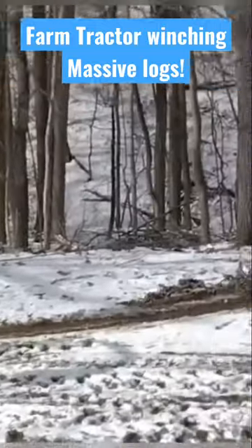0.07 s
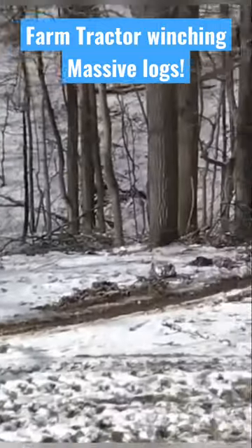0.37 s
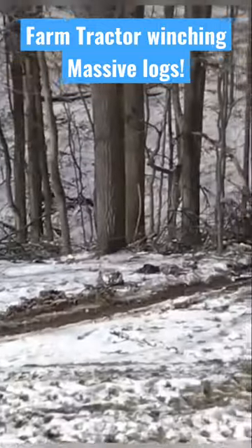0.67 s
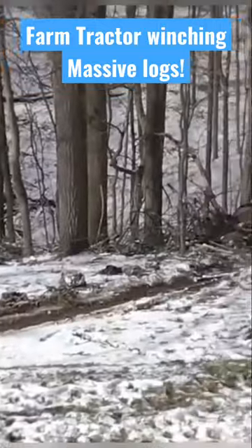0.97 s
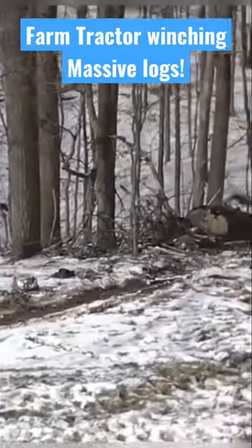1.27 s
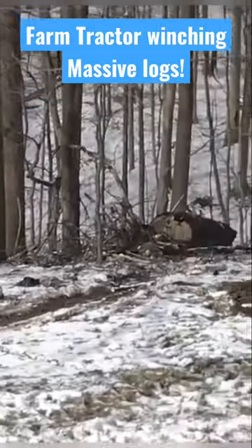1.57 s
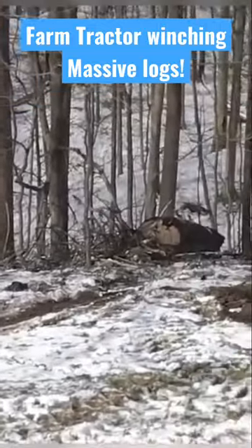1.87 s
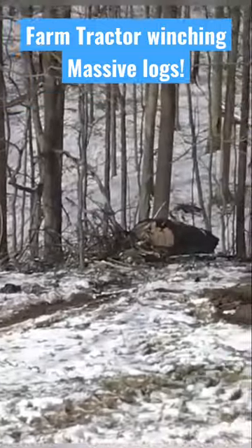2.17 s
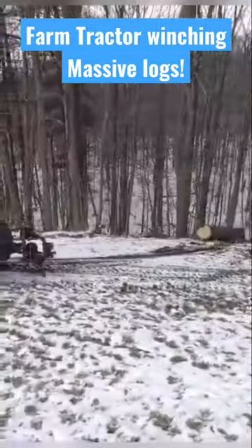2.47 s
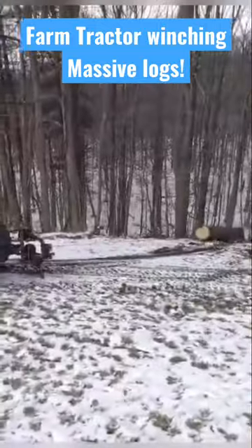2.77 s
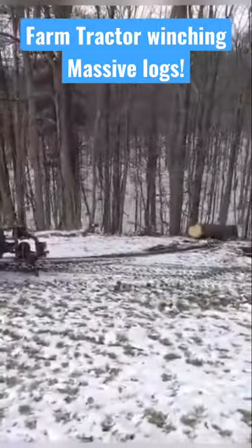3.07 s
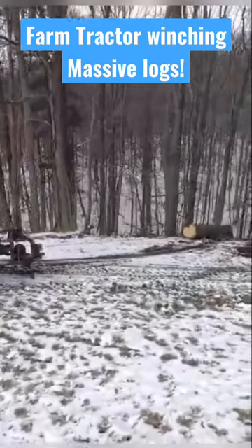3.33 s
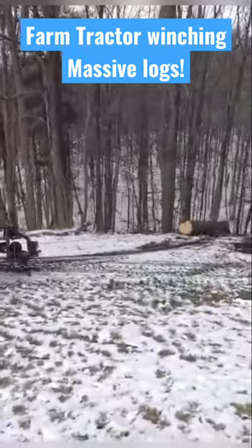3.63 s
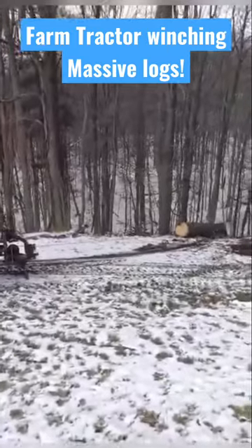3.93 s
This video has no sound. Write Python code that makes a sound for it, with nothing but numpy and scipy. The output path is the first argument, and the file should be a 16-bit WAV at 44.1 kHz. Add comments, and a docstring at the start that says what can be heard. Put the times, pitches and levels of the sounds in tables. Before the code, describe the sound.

A diesel tractor idles faintly outdoors with a slow, knocking chug. A jacket rustles and ticks near the microphone, snapping sharply around 2.3 seconds. At 2.4 seconds the engine abruptly becomes nearer, louder and faster, with light metallic ringing and a thin hiss. Wind buffets the microphone unevenly left and right until the end at 4 seconds, strongest near 2.5 and 3.7, with a few more cloth ticks.

```python
"""A three-cylinder diesel tractor idles some way off in snowy woods, each firing an impulse that
drives the engine block and the exhaust. Near the microphone a jacket rustles by friction and ticks.
Then, abruptly, the tractor is nearer and running faster to winch a log: a metal part rings with it,
a thin hiss lies above it, and turbulent gusts of wind buffet the two microphone ports in turn."""
import sys
import numpy as np
from scipy import signal
from scipy.fft import rfft, irfft
from scipy.io import wavfile
from scipy.ndimage import uniform_filter1d

SR = 44100
rng = np.random.default_rng(int(sys.argv[2]) if len(sys.argv) > 2 else 0)


def waveform_to_disk(signal):
    """Save audio, clipped to [-1, 1], as 16-bit WAV at the path in sys.argv[1]."""
    frames = np.transpose(np.atleast_2d(signal))
    scaled = np.clip(frames, -1, 1) * 32767
    samples = np.round(scaled).astype(np.int16)
    wavfile.write(sys.argv[1], SR, samples)


N = 176400
T, HZ = np.arange(N) / SR, np.fft.rfftfreq(N, 1 / SR)


def amp(db):
    """Amplitude ratio: a factor of ten for every 20 dB."""
    return 10 ** (np.asarray(db) / 20)


def unit(x):
    """Normalisation to an rms of 1."""
    return x / np.sqrt(np.mean(x ** 2) + 1e-20)


def curve(rows, column=1):
    """Linear interpolation of a time table at every sample."""
    rows = np.array(rows)
    return np.interp(T, rows[:, 0], rows[:, column])


def spectrum(rows):
    """Interpolation of a frequency table at every bin, on a logarithmic axis."""
    hz, value = np.transpose(rows)
    return np.interp(np.log(HZ + 1), np.log(hz + 1), value)


def pan(db):
    """Level difference sets direction: the left gain exceeds the right by db."""
    return amp([[db / 2], [-db / 2]])


def wander(rate_hz):
    """Random modulation: low-pass noise of rms 1."""
    return unit(irfft(rfft(rng.standard_normal(N)) / (1 + (HZ / rate_hz) ** 4), N))


def noise(gain, coherence=0., ripple_db=0.):
    """Filtered, partly coherent stereo noise; spectral ripple stands for many small resonances."""
    left, independent = rfft(rng.standard_normal((2, N)))
    right = coherence * left + np.sqrt(1 - coherence ** 2) * independent
    ripple = rng.standard_normal((2, len(HZ)))
    ripple = unit(uniform_filter1d(uniform_filter1d(ripple, 260), 260))
    resonances = amp(ripple_db * ripple * np.minimum(HZ / 2500, 1))
    return unit(irfft(np.array([left, right]) * gain * resonances, N))


def flicker(x, depth_db):
    """Random gain over time and frequency makes the timbre fluctuate."""
    frames = signal.stft(x, nperseg=512)[2]
    field = rng.standard_normal(frames.shape[:0:-1]).T
    field = unit(uniform_filter1d(uniform_filter1d(field, size=3, axis=0), size=9, axis=1))
    return unit(signal.istft(frames * amp(depth_db * field))[1][:, :N])


def envelope(t, rise_s, hold_s, fall_db_per_s):
    """Linear rise, hold and exponential decay."""
    return np.clip(t / rise_s, 0, 1) * amp(-fall_db_per_s * np.maximum(t - rise_s - hold_s, 0))


def add(mix, at, sound):
    """Superposition of a sound from the given sample on."""
    part = mix[at:at + len(sound)]
    part += sound[:len(part)]


def firings(rate, first_cylinder_s):
    """Phase is the integral of rate; each whole count gives a firing as (sample, cylinder)."""
    count = np.cumsum(curve(rate)) / SR
    count -= np.interp(first_cylinder_s, T, count)
    return [(at, int(round(count[at])) % 3) for at in np.flatnonzero(np.diff(np.floor(count)))]


def cyclic(x, fired, share=0.35):
    """Periodicity: a share of the power repeats its waveform in every engine cycle."""
    starts = np.array([0] + [at for at, cylinder in fired if cylinder == 0])
    age = np.arange(N) - starts[np.searchsorted(starts, np.arange(N), "right") - 1]
    repeating = x[:, ::-1][:, age]
    return np.sqrt(1 - share) * x + np.sqrt(share) * repeating


# Each row: frequency in Hz, coherence of left and right from 0 to 1.
BLOCK_COHERENCE = [(60, 0.92), (600, 0.92), (1300, 0.64), (2800, 0.55), (6000, 0)]


def engine_block(fired, cylinders, colour, flicker_db, whirr_db, uneven_db, clatter_db):
    """Impulsive excitation: each firing knocks the block, adding in power to a steady whirr."""
    block = noise(amp(spectrum(colour)), spectrum(BLOCK_COHERENCE), ripple_db=3.5)
    block = flicker(block, flicker_db)
    low_power, treble_power = np.full((2, N), amp(whirr_db) ** 2)
    for at, cylinder in fired:
        db, rise, hold, fall, treble_db = cylinders[cylinder]
        knock = amp(db + uneven_db * rng.standard_normal()) * envelope(T[:SR // 10], rise, hold, fall)
        add(low_power, at, knock ** 2)
        add(treble_power, at, (amp(treble_db) * knock) ** 2)
    block = cyclic(block, fired)
    low = irfft(rfft(block) / (1 + (HZ / 1890) ** 10), N)
    knocks = np.sqrt(low_power) * low + np.sqrt(treble_power) * (block - low)
    return unit(knocks * amp(clatter_db * wander(420)))


def exhaust(fired):
    """Each firing releases a pressure pulse, a soft thump of rising pitch."""
    centre_hz, glide_hz_per_s, width_s, delay_s = 102, 840, 0.014, 0.0071
    thumps, lead = np.zeros(N + SR), SR // 20
    t = T[:3 * lead] - lead / SR - delay_s
    cycles = centre_hz * t + glide_hz_per_s * t ** 2 / 2
    thump = -np.cos(2 * np.pi * cycles) * np.exp(-(t / width_s) ** 2 / 2)
    for at, _ in fired:
        add(thumps, at, amp(-46 + 1.1 * rng.standard_normal()) * thump)
    return thumps[lead:lead + N]


# Each row: time in seconds, firings per second.
IDLE_FIRING_RATE = [(0, 17.35), (1.1, 17.33), (1.3, 17.52), (2.3, 17.6)]
# Each row, one per cylinder: relative level in dB, rise and hold in seconds, decay in dB per second,
# extra treble in dB.
IDLE_KNOCKS = [(3, 0.012, 0.001, 380, 0), (2.5, 0.011, 0.0036, 240, 0), (-0.5, 0.0057, 0.002, 200, 4.5)]
# Each row: frequency in Hz, relative spectral level of the block in dB.
IDLE_SPECTRUM = [(25, -9), (60, 3.5), (170, 2), (270, -6), (400, -3), (465, -8), (520, 0), (720, 0),
                 (840, -4.5), (940, -1.5), (1030, -8), (1200, -1.5), (1510, -2), (1700, -10.5),
                 (2200, -12.5), (2450, -21), (2660, -13), (3000, -23.5), (5000, -30.5), (11000, -35),
                 (13000, -34)]


def idling_engine():
    """A slow pulse train: the firings are heard as separate thumps and diesel knocks."""
    fired = firings(IDLE_FIRING_RATE, first_cylinder_s=0.0327)
    thumps = exhaust(fired)
    knocks = engine_block(fired, IDLE_KNOCKS, IDLE_SPECTRUM,
                          flicker_db=2.3, whirr_db=-14, uneven_db=0.7, clatter_db=0.7)
    return pan(0.75) * thumps + amp(-52) * pan(1) * knocks


# Each row: start, rise and hold in seconds, level in dB, decay in dB per second, whistle gain.
CLOTH_STROKES = [(-.03, 0.053, 0.059, -50.5, 123, 0), (0.22, 0.055, .02, -58, 52, 0),
                 (0.744, 0.017, 0.19, -57, 78, 0.37), (1.232, 0.042, 0.06, -62, 62, 0),
                 (1.567, 0.068, 0.057, -53, 86, 0.51), (1.84, 0.14, .03, -66, 48, 0.19),
                 (2.284, 0.033, 0.063, -40.5, 482, 0)]
# Each row: frequency in Hz, relative spectral level in dB.
CLOTH_SPECTRUM = [(300, -13), (1500, 9), (3000, 5), (4200, 5.5), (5200, 3), (7200, 8), (9700, 8.5),
                  (13000, 3)]


def jacket_rustle():
    """Sliding friction makes grainy broadband noise; the weave adds a narrow whistling band."""
    whistle_hz, half_width_hz = 9720, 150
    cloth = flicker(noise(amp(spectrum(CLOTH_SPECTRUM)), ripple_db=3.5), depth_db=3.2)
    whistle = noise(1 / (1 + ((HZ - whistle_hz) / half_width_hz) ** 2))
    swishes = sum(amp(db) * envelope(T - start, rise, hold, fall) * (cloth + gain * whistle)
                  for start, rise, hold, db, fall, gain in CLOTH_STROKES)
    return swishes * amp(0.67 * wander(410) + 2.3 * wander(23))


# Each row: start in seconds, level in dB, rise in seconds.
CLOTH_SNAPS = [(0.2156, -50.5, 0.001), (0.7383, -38, 0.0003), (0.8073, -36.5, 0.0014), (.8775, -41, 0.0024),
               (2.074, -53, 0.001), (2.2898, -26, 0.0018), (2.3885, -28.5, 0.0004), (2.511, -39, .001),
               (3.0138, -35.5, 0.0003), (3.2405, -35, 0.0004), (3.899, -41, 0.002)]
# Each row: frequency in Hz, relative spectral level in dB.
SNAP_SPECTRUM = [(1500, -16), (3000, -3), (4700, 3), (10000, -1), (13000, -8)]


def jacket_snaps():
    """Snapping cloth radiates transients: bright, crackling bursts that decay in milliseconds."""
    bursts = np.zeros(N)
    for start, db, rise in CLOTH_SNAPS:
        add(bursts, round(start * SR), amp(db) * envelope(T[:SR // 20], rise, 0, fall_db_per_s=3000))
    crackle = amp(1.5 * wander(1500))
    return bursts * crackle * flicker(noise(amp(spectrum(SNAP_SPECTRUM))), depth_db=2.5)


# Each row: time in seconds, firings per second.
WORK_FIRING_RATE = [(2.4, 29.35), (4, 29.45)]
# Each row, one per cylinder: relative level in dB, rise and hold in seconds, decay in dB per second,
# extra treble in dB.
WORK_KNOCKS = [(6.5, 0.003, 0.009, 560, 0), (4, 0.0018, 0.008, 360, 3), (4.5, 0.008, 0.002, 420, -2)]
# Each row: frequency in Hz, relative spectral level of the block in dB.
WORK_SPECTRUM = [(30, -14), (120, 5.5), (200, 18), (320, -5.5), (430, 6.5), (510, 5.5), (600, 0),
                 (1150, -2.5), (1490, 0), (1640, -7), (1950, -2), (2450, -8.5), (2900, -6), (3150, -19.5),
                 (3500, -18), (8000, -22), (13000, -55)]
# Each row: time in seconds, level in dB.
WORK_ENVELOPE = [(2.42, -34), (2.5, -37.5), (2.62, -41), (3.1, -44), (3.6, -42), (4, -43.5)]
# Each row: time in seconds, brief change of level in dB.
WORK_ACCENTS = [(2.752, 0.5), (2.856, 2.5), (2.96, -1), (3.57, 1.5)]


def working_engine():
    """A faster pulse train excites brighter knocks in the block and sets a metal part ringing."""
    fired = firings(WORK_FIRING_RATE, first_cylinder_s=2.538)
    knocks = engine_block(fired, WORK_KNOCKS, WORK_SPECTRUM,
                          flicker_db=2.4, whirr_db=-10.5, uneven_db=0.8, clatter_db=1.3)
    accents_db = sum(db * np.exp(-((T - time) / 0.018) ** 2 / 2) for time, db in WORK_ACCENTS)
    return amp(curve(WORK_ENVELOPE) + accents_db) * pan(1.5) * (knocks + metal_ring(fired))


# Each row: mode frequency in Hz, relative level in dB.
METAL_MODES = [(2665, -6.5), (2900, -17)]
# Each entry: how hard one cylinder drives the part, in relative dB.
METAL_DRIVE_DB = [1.5, -2.5, -2.5]


def metal_ring(fired):
    """Damped modes of a metal part ring at each firing, driven hardest by the first cylinder."""
    t, stereo = T[:SR // 10], np.zeros((2, N))
    decay = envelope(t, rise_s=0.009, hold_s=0, fall_db_per_s=450)
    for at, cylinder in fired:
        for hz, db in METAL_MODES:
            gain = amp(db + METAL_DRIVE_DB[cylinder] + 2 * rng.standard_normal())
            pitch = hz * (1 + 0.006 * rng.standard_normal())
            for channel in stereo:
                add(channel, at, gain * decay * np.sin(2 * np.pi * (pitch * t + rng.random())))
    return stereo


# Each row: frequency in Hz, relative spectral level in dB.
HISS_SPECTRUM = [(1500, -22), (3500, 17), (5200, 9.5), (7500, 13.5), (13000, 8.5)]
# Each row: time in seconds, level in dB.
HISS_ENVELOPE = [(2.42, -50.5), (2.75, -50.5), (2.82, -56.5), (3.32, -52), (3.78, -54), (3.83, -50.5),
                 (4, -55.5)]


def hiss():
    """Random amplitude modulation of treble noise gives a thin, restless hiss."""
    gain = amp(curve(HISS_ENVELOPE) + 2 * wander(70))
    treble = flicker(noise(amp(spectrum(HISS_SPECTRUM)), ripple_db=3.5), depth_db=4.5)
    return pan(-3) * gain * treble


# Each row: time in seconds, relative level in dB, nominal upper cutoff in Hz.
LEFT_GUSTS = [(2.41, -25, 200), (2.47, -23, 149), (2.54, -18.5, 138), (2.68, -32, 191), (2.83, -25, 246),
              (2.89, -30, 186), (2.95, -22, 248), (2.99, -29.5, 210), (3.05, -25.5, 209), (3.17, -33, 180),
              (3.3, -25.5, 200), (3.41, -21, 200), (3.52, -23.5, 283), (3.8, -38, 249), (4, -42, 150)]
RIGHT_GUSTS = [(2.41, -30, 344), (2.428, -9.5, 516), (2.47, -16.5, 530), (2.515, -20, 468),
               (2.55, -31.5, 170), (2.63, -35.5, 129), (2.8, -25.5, 125), (2.96, -37.5, 120),
               (3.06, -22.5, 119), (3.14, -34, 120), (3.28, -21, 127), (3.54, -38.5, 119), (3.62, -20, 318),
               (3.68, -11, 640), (3.705, -23.5, 370), (3.74, -21.5, 337), (3.81, -15.5, 457),
               (3.87, -27, 164), (3.93, -35.5, 130), (3.98, -30.5, 125)]


def wind(gusts):
    """Turbulent pressure at one port: each random surge raises both level and bandwidth."""
    low_cut_hz, octaves_per_db = 66, 0.16
    surge_db = wander(72)
    cutoff_hz = curve(gusts, column=2) * 2 ** (octaves_per_db * surge_db)
    white, rumble, power = rfft(rng.standard_normal(N)), 0, 1e-12
    for hz in 2 ** np.arange(4.5, 11.5, 0.5):  # half-octave bands
        octaves_off = abs(np.log2((HZ + 0.1) / hz))
        band = irfft(white * np.maximum(1 - 2 * octaves_off, 0), N)
        gain = np.exp(-(hz / cutoff_hz) ** 1.54) / (1 + (low_cut_hz / hz) ** 3.06)
        rumble += gain * band
        power += gain ** 2 * band.var()
    return amp(curve(gusts) + surge_db - 3) * rumble / np.sqrt(power)


# Each row: centre in seconds, envelope peak in dB, frequency in Hz, port (0 left, 1 right).
EDDY_PUFFS = [(2.426, -13, 69, 1), (2.511, -6.5, 530, 1), (2.607, -15, 250, 0), (2.636, -16, 325, 0),
              (2.809, -11.5, 260, 0), (2.829, -15.5, 278, 0), (2.946, -10.5, 270, 0), (2.961, -14, 240, 0),
              (3.119, -10.5, 300, 0), (3.348, -13, 231, 0), (3.408, -10, 170, 0), (3.425, -12, 140, 0),
              (3.521, -15, 200, 0), (3.658, -12, 670, 1), (3.734, -8.5, 213, 1), (3.77, -12, 267, 1)]


def eddies():
    """An eddy striking one port makes a pressure wave packet a few cycles long."""
    ports, half, width_cycles = np.zeros((2, N)), SR // 20, 0.47
    for centre, db, hz, port in EDDY_PUFFS:
        cycles = np.arange(-half, half) / SR * hz
        window = np.exp(-(cycles / width_cycles) ** 2 / 2)
        puff = window * np.sin(2 * np.pi * (cycles + rng.random()))
        add(ports[int(port)], round(centre * SR) - half, amp(db) * puff)
    return ports


def scene():
    """The sources superpose; the idle gives way abruptly to the working engine in the wind."""
    change_s = 2.413
    later = np.clip((T - change_s) / 0.00024, 0, 1)
    buffeting = np.array([wind(LEFT_GUSTS), wind(RIGHT_GUSTS)]) + eddies()
    idling = idling_engine()
    winching = working_engine() + hiss() + buffeting
    return (1 - later) * idling + later * winching + jacket_rustle() + jacket_snaps()


def record(dry):
    """Low-pass filtering: the microphone dulls the highest treble, then a steep band limit follows."""
    microphone_hz, limit_hz = 12000, 13200
    dulled = irfft(rfft(dry) / np.sqrt(1 + (HZ / microphone_hz) ** 20), N)
    band_limit = signal.firwin(511, limit_hz, window=("kaiser", 8), fs=SR)
    return signal.oaconvolve(dulled, band_limit[None], "same")


dry = scene()
out = record(dry)
waveform_to_disk(out)
```